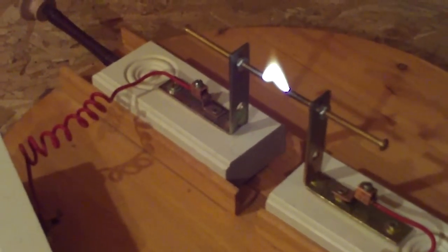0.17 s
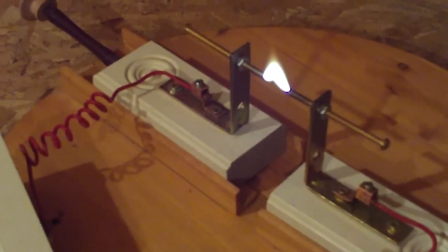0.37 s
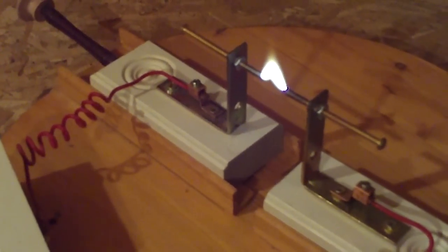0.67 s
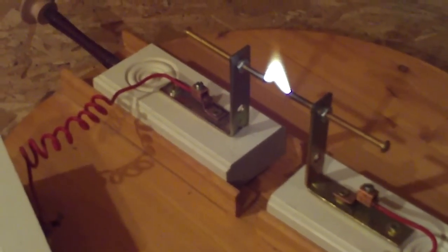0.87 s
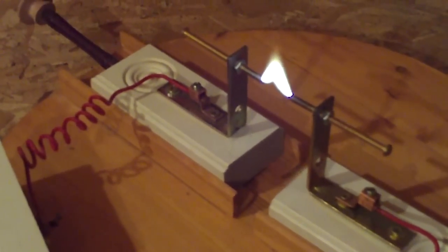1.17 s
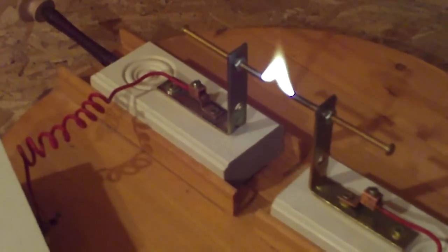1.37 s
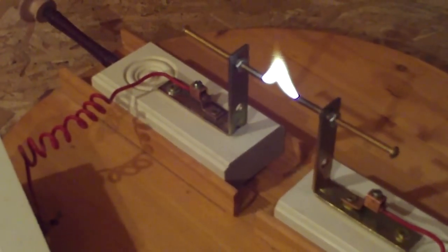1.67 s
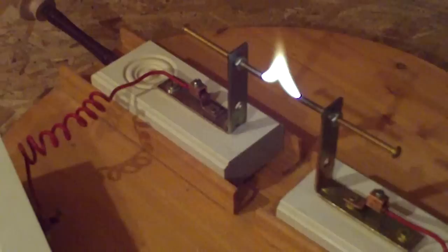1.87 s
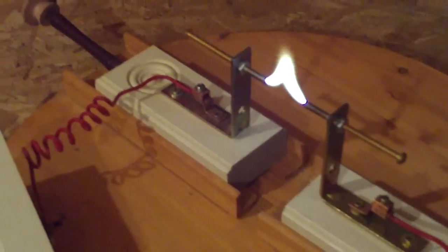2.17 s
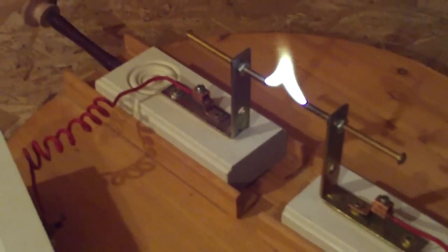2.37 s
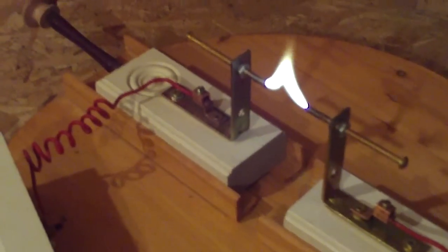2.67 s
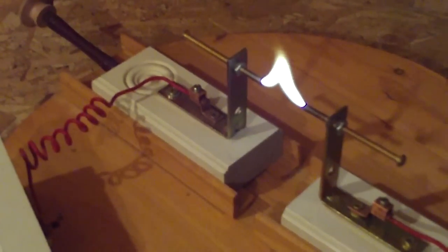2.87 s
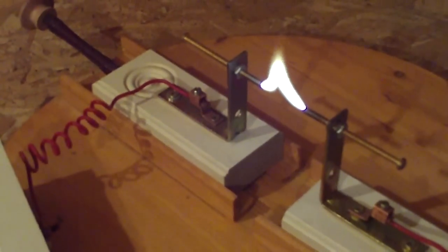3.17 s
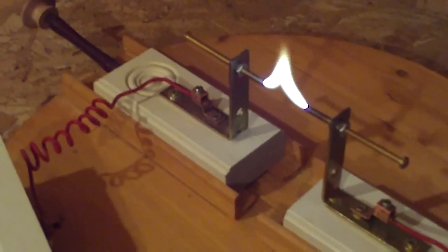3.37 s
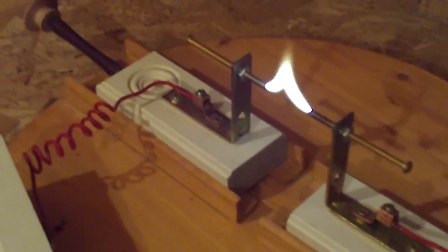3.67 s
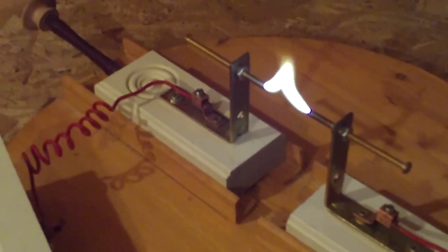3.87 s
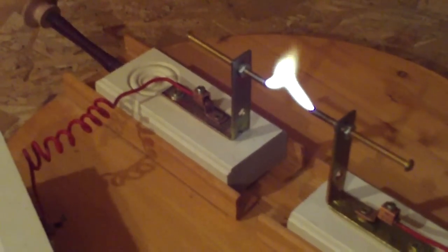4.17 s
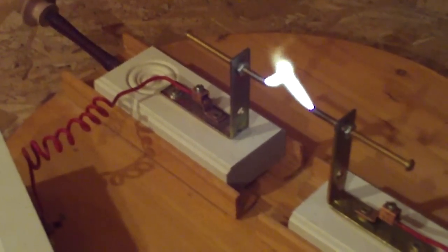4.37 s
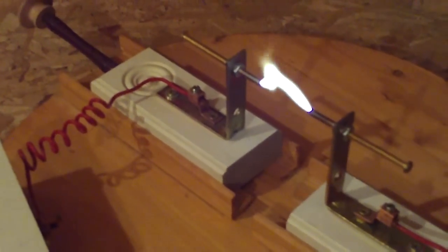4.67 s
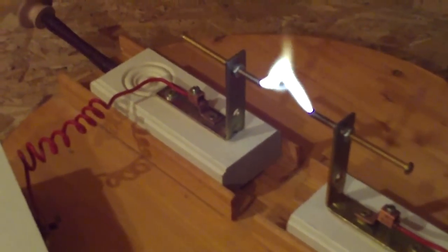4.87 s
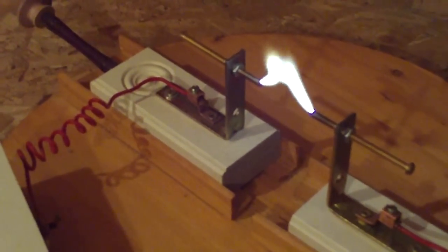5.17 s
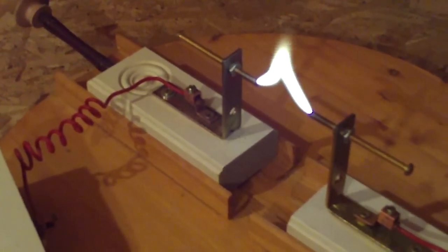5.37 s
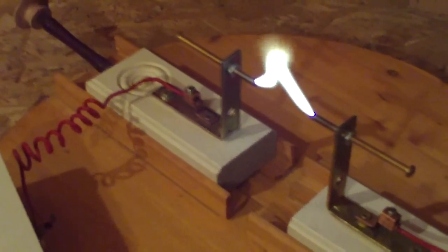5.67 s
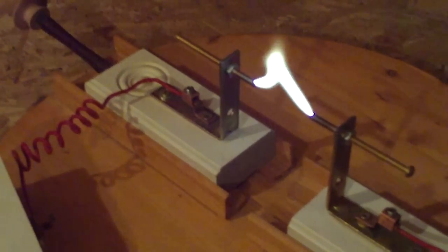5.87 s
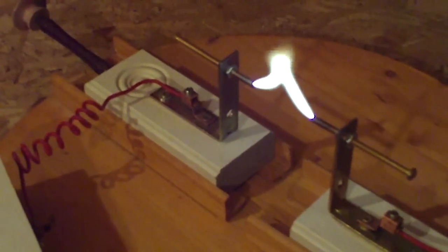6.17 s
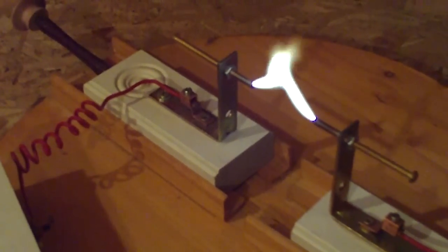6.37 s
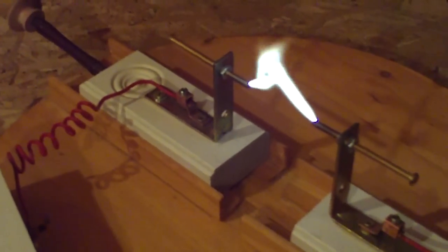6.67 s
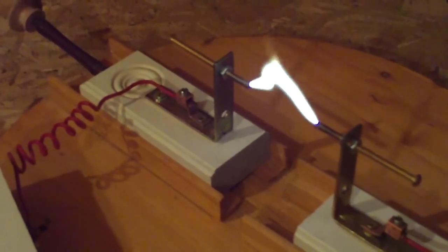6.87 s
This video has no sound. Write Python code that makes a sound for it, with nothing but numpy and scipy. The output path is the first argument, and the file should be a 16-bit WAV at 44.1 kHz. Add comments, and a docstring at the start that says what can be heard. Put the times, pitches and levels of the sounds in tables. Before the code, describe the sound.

Steady low mains buzz of a burning electric arc in a small room, swelling gradually, then turning uneven, raspy and sputtering until cut off.

```python
"""A mains-fed high-voltage arc burns between two rods on a wooden table while the gap is slowly widened.
It strikes anew on every half cycle: its heat pulse, a sum of harmonics, hums, and the strike itself
snaps in the treble as a pair of filtered clicks. As the flame lengthens it grows louder, and its strikes
turn uneven: filtered clicks of random size sputter, flare and rattle. A thin whine fades with the calm.
A small room reflects the clicks, and shaped noise gives its low rumble and faint hiss."""
import sys
import numpy as np
from scipy import signal
from scipy.fft import rfft, irfft
from scipy.io import wavfile
from scipy.ndimage import uniform_filter1d, map_coordinates

SR = 44100
rng = np.random.default_rng(int(sys.argv[2]) if len(sys.argv) > 2 else 0)


def to_wav(s):
    """Save 16-bit WAV."""
    ch = np.atleast_2d(s).T  # columns
    pcm = np.round(np.clip(ch, -1, 1) * 32767)  # PCM
    wavfile.write(sys.argv[1], SR, pcm.astype(np.int16))


N = 310023

STRIKE_HZ = 120  # twice the mains frequency
LAG_MS = 0.21  # common delay of the pulses and of most clicks
RESTING_OFFSET_MS = 0.005  # the two polarities never quite match
FLOOR_DB = -34.5  # rms level of the room's rumble and hiss, before its swell
EDGE_HZ = 7200  # upper limit of the sound
TAPS = 16384  # length of the room and colour filters, in samples

# Spectral density of the room's rumble and hiss. Each row: frequency in Hz, relative density in dB.
FLOOR_COLOUR = [(8, -14.5), (25, 3), (45, -11.5), (80, -13.5), (200, -20.5), (450, -25), (1000, -26),
                (2000, -30), (4000, -33.5), (5800, -40), (6300, -51.5), (7200, -48.5)]
# Early reflections from the table and nearby surfaces. Each row: delay in ms, strength as a factor.
REFLECTIONS = [(.84, .7), (2.67, .8), (4.93, .58)]
# Restlessness of the lengthening flame. Each row: time in seconds, random scatter of the strikes in ms.
UNREST = [(0, .004), (1.3, 0.0066), (3.95, 0.013), (4.4, .028), (5.45, 0.021), (6.2, 0.027), (7.03, 0.045)]
# Gusts in which the flame flutters and flares. Each row: centre in seconds, added scatter in ms,
# half length in seconds, roar relative to the hum in dB.
GUSTS = [(4.463, 0.025, .04, -17), (4.675, 0.024, .03, -22), (4.943, 0.054, 0.015, -13.5),
         (5.057, .025, .025, -19), (5.296, 0.034, 0.025, -13), (5.764, 0.047, .028, -18),
         (5.872, 0.02, 0.015, -8), (6.383, .02, .02, -18.5), (6.481, .025, 0.017, -21),
         (6.57, 0.035, .024, -17.5), (6.675, 0.035, 0.012, -12), (6.768, 0.056, 0.016, -8),
         (7.023, .045, 0.018, -16)]
# Spells in which one polarity strikes late and the other early. Each row: centre in seconds,
# added offset of either polarity in ms, half length in seconds.
SPELLS = [(4.78, .05, .04), (5.108, 0.055, 0.032), (5.232, 0.1, 0.041), (5.355, .068, 0.028),
          (5.605, .03, 0.025), (5.8, .035, 0.032), (6.144, 0.051, .035)]
# Partials of the whine. Each row: multiple of the strike rate, mean level in dB for strikes without scatter.
WHINE = [(39, -44.5), (43, -53), (44, -70.5)]
# Spectrum of the mains-rate rattle. Each row: frequency in Hz, relative density in dB.
RATTLE_COLOUR = [(300, -13), (1030, 0.5), (1600, -9), (1850, -2), (2400, -2.5), (2750, -10), (3100, -4),
                 (3500, -16), (4200, -2), (6000, -25.5), (7000, -33)]
# Spectrum of a flare's roar. Each row: frequency in Hz, relative density in dB.
FLARE_COLOUR = [(100, -12), (290, -5), (390, -9.5), (470, 1), (750, 4), (1030, 3), (1350, -5), (2000, -7.5),
                (3500, -31)]
# Spectrum of the sputter. Each row: frequency in Hz, relative density in dB.
SPUTTER_COLOUR = [(60, -19), (150, 1.5), (290, 5.5), (390, -3), (480, 4.5), (750, -6), (1050, 4.5),
                  (1300, -10), (1620, -3), (1850, -7.5), (2500, -6.5), (2750, -11), (3100, -7.5),
                  (3500, -13), (6000, -27.5)]
# Spectrum of the snap. Each row: frequency in Hz, relative density in dB.
SNAP_COLOUR = [(1500, -36.5), (2600, -22), (3150, -8.5), (3450, -9.5), (3750, -5), (4400, -14), (4700, 2),
               (4950, -2), (5200, 1.5), (5850, -4.5), (6150, -7.5), (7100, -19.5)]
# Strength of the snap. Each row: time in seconds, treble level in dB outside the lopsided spells.
SNAP_LEVEL = [(0, -43.5), (1.3, -43.5), (3.25, -47.5), (4.35, -46.5), (4.75, -55.5), (5.05, -49),
              (6.15, -46.5), (7.03, -40.3)]
# Strength of the hum. Each row: time in seconds, joint level of the two lowest partials in dB,
# trend of the overtones relative to them in dB.
HUM_LEVEL = [(0.0, -29.5, -5), (1.13, -29, -4), (1.27, -27.5, -5), (2.33, -25, -5.5), (4.17, -24, -6),
             (4.84, -22, -6.5), (6.99, -20, -7.5), (7.03, -20.5, -4.5)]
# Shape of the flame. Each row: time in seconds, length from 0 (short) to 1 (long), lift of the third partial in dB.
FLAME = [(0, 0.53, 3), (1.0, 0.58, 2.5), (2.1, 0.69, -9.5), (3.2, 0.73, -22.5), (4.2, 0.71, -10),
         (4.8, 0.74, -0.5), (5.8, 0.73, 3.5), (7.03, 0.73, 7)]
# Harmonics of a short flame. Each row: multiple of the strike rate, relative level in dB.
SHORT_FLAME = [(1, 7.5), (2, 11.5), (3, 10.5), (4, -4), (5, 7), (6, 9), (7, 17), (8, -16), (9, -60.5),
               (10, -10.5), (11, -43.5), (12, -20.5), (13, -10.5), (14, -42), (15, -25.5), (16, -36.5),
               (17, -31), (18, -42.5), (19, -28.5), (20, -35.5), (21, -47), (22, -21.5), (23, -58.5),
               (24, -23.5)]
# Harmonics of a drawn-out flame. Each row: multiple of the strike rate, relative level in dB.
LONG_FLAME = [(1, 14), (2, 13.5), (3, -23.5), (4, -2.5), (5, -1.5), (6, -3.5), (7, -12.5), (8, -5), (9, -7),
              (10, -13.5), (11, -8.5), (12, -14), (13, -24.5), (14, -43), (15, -9), (16, -12.5),
              (17, -15.5), (18, -7.5), (19, -24), (20, -17), (21, -15.5), (22, -32), (23, -48.5), (24, -26)]
# Odd harmonics that appear as the half cycles differ. Each row: multiple of the mains frequency, relative level in dB.
LOPSIDED = [(3, -31.5), (5, -28.5), (13, -35.5), (15, -35.5), (17, -27.5), (29, -39), (31, -29),
            (33, -29.5), (39, -37.5), (41, -36), (49, -36), (51, -33.5)]


def amp(db):
    """A level in decibels is 20 times the logarithm of the gain returned here."""
    return 10 ** (np.asarray(db) / 20)


def unit(x):
    """Root-mean-square normalisation: scales a signal to rms 1."""
    return x / np.sqrt(np.mean(x ** 2) + 1e-20)


def curve(rows, t):
    """Linear interpolation: every column of a table at the times t."""
    s, *columns = np.transpose(rows)
    return [np.interp(t, s, column) for column in columns]


def colour(points, size):
    """Spectral envelope: a dB curve, linear in log frequency, on the bins of an FFT."""
    hz, db = np.transpose(points)
    bins_hz = np.fft.rfftfreq(size, 1 / SR)
    return np.interp(np.log(bins_hz + 1), np.log(hz + 1), db)


def causal_phase(db):
    """Minimum phase: the Hilbert transform of the log spectrum gives the most compact causal pulse."""
    circle = np.concatenate([db, db[-2:0:-1]]) * np.log(10) / 20
    return -signal.hilbert(circle).imag[:len(db)]


def band_rms(x, lo_hz, hi_hz):
    """Parseval's theorem: the rms of one band from the energy of its bins."""
    hz = np.fft.rfftfreq(len(x), 1 / SR)
    band = rfft(x)[(hz > lo_hz) & (hz < hi_hz)]
    return np.sqrt(2 * np.sum(abs(band) ** 2)) / len(x)


def drift(t, rate_hz):
    """Slow random modulation: smoothly joined random values, scaled to rms 1."""
    knots = rng.standard_normal(1024)
    return unit(map_coordinates(knots, [t * rate_hz], order=2, mode="wrap"))


def bump(t, s, half):
    """Gaussian envelope: a smooth rise and fall around the time s."""
    return np.exp(-0.5 * ((t - s) / half) ** 2)


def room_floor(swell_db=0.5, swell_hz=4, rumble_hz=60):
    """Filtered noise: a low rumble that swells at random, under an even faint hiss."""
    spectrum = rfft(rng.standard_normal(N)) * amp(colour(FLOOR_COLOUR, N))
    sound = unit(irfft(spectrum, N))
    lowpass = signal.butter(2, rumble_hz, fs=SR, output="sos")
    rumble = signal.sosfiltfilt(lowpass, sound)
    swell = unit(amp(swell_db * drift(np.arange(N) / SR, swell_hz)))
    return amp(FLOOR_DB) * (sound + rumble * (swell - 1))


def reflections(hz):
    """Delay as phase: the frequency response of a few discrete early reflections."""
    return sum(size * np.exp(-2j * np.pi * hz * ms / 1000) for ms, size in REFLECTIONS)


def room(early, wet_db, t60):
    """Reverberation: direct sound, early reflections and an exponentially decaying diffuse tail."""
    t, hz = np.arange(TAPS) / SR, np.fft.rfftfreq(TAPS, 1 / SR)
    tail = rng.standard_normal(TAPS) * np.exp(-np.log(1000) * t / t60)  # falls 60 dB in t60 seconds
    diffuse = amp(wet_db) * rfft(tail / np.linalg.norm(tail))
    response = 1 + early * reflections(hz) + diffuse
    # even in broad colour, so that only the fine ripples remain
    return response / np.sqrt(uniform_filter1d(abs(response) ** 2, size=90))


def strike_times():
    """Re-ignition at each half cycle: two evenly spaced strikes in every mains cycle."""
    return np.arange(int(N / SR * STRIKE_HZ) + 1) / STRIKE_HZ


def flutter(t):
    """Timing jitter: the spread of the strike times in ms, from the flame's unrest plus its gusts."""
    gusts = sum(ms * bump(t, s, half) for s, ms, half, _ in GUSTS)
    return curve(UNREST, t)[0] + gusts


def polarity(t):
    """Half-cycle asymmetry: how late one polarity and how early the other strikes, in ms."""
    return RESTING_OFFSET_MS + sum(ms * bump(t, s, half) for s, ms, half in SPELLS)


def strike_delays():
    """Ignition delay: each strike's lateness in ms, by random jitter and by alternating polarity."""
    t = strike_times()
    by_chance = flutter(t) * rng.standard_normal(len(t))
    by_polarity = polarity(t) * (-1) ** np.arange(len(t))
    return by_chance + by_polarity


def strikes(times, sizes, points, space):
    """Impulse excitation: band-limited clicks at exact times, convolved with a colour and the room."""
    at = np.round(times * SR).astype(int)[:, None] + np.arange(-8, 9)
    offset = at - times[:, None] * SR
    clicks = sizes[:, None] * np.sinc(offset) * np.sinc(offset / 9)  # windowed sinc, between samples
    train = np.bincount(at.ravel() % (2 * N), clicks.ravel(), 2 * N)[:N]
    db = colour(points, TAPS)
    response = irfft(amp(db) * np.exp(1j * causal_phase(db)) * space)
    return signal.oaconvolve(train, response)[:N]


def whine(calm_ms=0.006, waver_db=2.0, waver_hz=14):
    """Loss of coherence: high harmonics of the strike rate fade as the strikes lose their regularity."""
    t = np.arange(N) / SR
    lines = 0
    for k, db in WHINE:
        level = amp(db + waver_db * drift(t, waver_hz))
        cycles = round(k) * STRIKE_HZ * t + rng.random()
        lines = lines + level * np.cos(2 * np.pi * cycles)
    return np.sqrt(2) * lines * np.exp(-flutter(t) / calm_ms)


def rattle(rattle_db=-18.0, full_ms=0.07, scatter_ms=0.04, early=1.0, wet_db=9.5, t60=0.11):
    """Subharmonic of the strike rate: clicks of alternating sign rattle as the polarities differ."""
    strike_t, t = strike_times(), np.arange(N) / SR
    late_ms = LAG_MS + scatter_ms * rng.standard_normal(len(strike_t))
    signs = (-1.0) ** np.arange(len(strike_t))
    sound = strikes(strike_t + late_ms / 1000, signs, RATTLE_COLOUR, room(early, wet_db, t60))
    level = amp(rattle_db + curve(HUM_LEVEL, t)[0])
    return unit(sound) * polarity(t) / full_ms * level


def flares(early=1.0, wet_db=6.5, t60=0.098):
    """Random pulse modulation: runs of wildly uneven pulses, heard as short dull roars."""
    strike_t, t = strike_times(), np.arange(N) / SR
    sizes = rng.standard_normal(len(strike_t))
    sound = strikes(strike_t, sizes, FLARE_COLOUR, room(early, wet_db, t60))
    sound /= np.sqrt(uniform_filter1d(sound ** 2, size=1500) + 1e-12)  # steady local power
    swell = sum(amp(db) * bump(t, s, half) for s, _, half, db in GUSTS)
    return sound * swell * amp(curve(HUM_LEVEL, t)[0])


def sputter(sputter_db=-15.5, calm_db=-24.0, gust_ms=0.059, surge=0.93,
            early=1.0, wet_db=11.0, t60=0.39, flicker_db=0.7, flicker_hz=18):
    """Random pulse strength: the room spreads uneven pulses into a rasp that surges with each gust."""
    strike_t, t = strike_times(), np.arange(N) / SR
    sizes = rng.standard_normal(len(strike_t))
    sizes /= np.sqrt(uniform_filter1d(sizes ** 2, size=4))
    sound = strikes(strike_t + LAG_MS / 1000, sizes, SPUTTER_COLOUR, room(early, wet_db, t60))
    sound /= band_rms(sound, 900, 3200)
    flicker = flicker_db * drift(t, flicker_hz)
    gust = amp(sputter_db + flicker) * (flutter(t) / gust_ms) ** surge
    # the calm and gusty parts add in power
    return sound * np.hypot(amp(calm_db), gust) * amp(curve(HUM_LEVEL, t)[0])


def snap(delay_ms, uneven=0.16, wet_db=-2.0, t60=0.21, spell_db_per_ms=-45):
    """Spark impulse: each strike cracks twice, more unevenly in flutter, more softly in a lopsided spell."""
    strike_t, t = strike_times(), np.arange(N) / SR
    scatter_ms = flutter(strike_t)
    late, strong = rng.standard_normal((len(strike_t), 2)).T
    first_ms = LAG_MS + delay_ms + scatter_ms * late / 2
    second_ms = LAG_MS + delay_ms + 0.72
    sizes = np.exp((uneven + 4.5 * scatter_ms) * strong)
    sizes /= np.sqrt(uniform_filter1d(sizes ** 2, size=16))
    space = room(0, wet_db, t60)
    sound = strikes(strike_t + first_ms / 1000, 0.65 * sizes, SNAP_COLOUR, space)
    sound += strikes(strike_t + second_ms / 1000, sizes, SNAP_COLOUR, space)
    sound /= band_rms(sound, 4600, 6200)
    return sound * amp(curve(SNAP_LEVEL, t)[0] + spell_db_per_ms * polarity(t))


def pulse_phase(hz, diffuse=2.12, diffuse_hz=1200):
    """Relaxation: the phase of a pulse cooling in under a millisecond, its highs mostly reflected."""
    cooling = 1 / (1 + 1j * hz / 230)
    reflected = 1j * hz / (500 + 1j * hz)
    scattered = diffuse / (1 + (diffuse_hz / hz) ** 8) * (rng.standard_normal(2) @ [1, 1j])
    arrival = cooling * (1 + reflected * reflections(hz) + scattered)
    return np.angle(arrival) - 2 * np.pi * hz * LAG_MS / 1000


def hum(delay_ms, overtone_db=2.0, upper_db=2.0, odd_db=1.0, odd_at_ms=0.02,
        waver_db=0.11, overtone_waver_db=0.31, waver_hz=26):
    """Fourier synthesis: a heat pulse per strike, whose harmonic balance changes with flame length."""
    t, strike_t = np.arange(N) / SR, strike_times()
    level, overtones = curve(HUM_LEVEL, strike_t)
    length, third_lift = curve(FLAME, strike_t)
    (k, short), (_, long) = np.transpose(SHORT_FLAME), np.transpose(LONG_FLAME)
    k = np.round(k)
    db = short[:, None] + (long - short)[:, None] * length  # rows are partials, columns are strikes
    db[k == 3] += third_lift

    # set the two lowest partials by their joint power, all others by that of partials 4 to 7
    base, middle, upper = k <= 2, (k > 3) & (k < 8), k >= 8
    base_power_db = 10 * np.log10((amp(db[base]) ** 2).sum(0))
    middle_power_db = 10 * np.log10((amp(db[middle]) ** 2).sum(0))
    db[base] += level - base_power_db
    db[~base] += level + overtones + overtone_db - middle_power_db
    db[upper] += upper_db
    db[~base] += overtone_waver_db * drift(strike_t, waver_hz)
    db += waver_db * drift(strike_t, waver_hz)

    # unequal half cycles add odd multiples of the mains frequency
    lopsided = np.sqrt(abs(polarity(strike_t)) / odd_at_ms)
    partials = list(zip(k * STRIKE_HZ, amp(db)))
    for odd, relative_db in LOPSIDED:
        size = lopsided * amp(level + odd_db + relative_db)
        partials.append((round(odd) * STRIKE_HZ / 2, size))

    # each pulse is shifted as a whole, which roughens the high partials more than the low ones
    held_ms = uniform_filter1d(delay_ms[(t * STRIKE_HZ).astype(int)], size=60)
    clock = t - held_ms / 1000
    pulse = 0
    for hz, size in partials:
        wave = np.cos(2 * np.pi * hz * clock + pulse_phase(hz))
        pulse = pulse + np.interp(t, strike_t, size) * wave
    return -np.sqrt(2) * pulse  # partials are rms levels; the pulse is a drop in pressure


def scene():
    """Superposition: the pressures of the arc and its room add, in mono."""
    delay_ms = strike_delays()
    background = room_floor()
    unsteady = whine() + rattle() + flares() + sputter()
    arc = snap(delay_ms) + hum(delay_ms)
    return (background + unsteady + arc)[None]


def record(dry):
    """Band limitation: a steep linear-phase lowpass removes the highest treble."""
    lowpass = signal.firwin(511, EDGE_HZ, window=("kaiser", 9), fs=SR)
    return signal.oaconvolve(dry, lowpass[None], "same")


dry = scene()
out = record(dry)
to_wav(out)
```